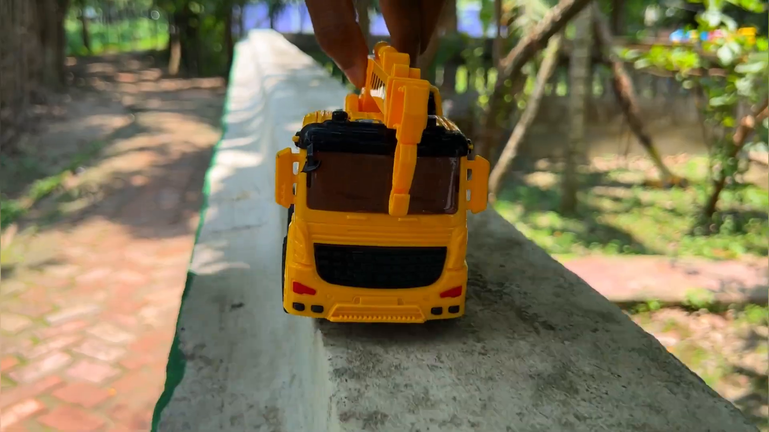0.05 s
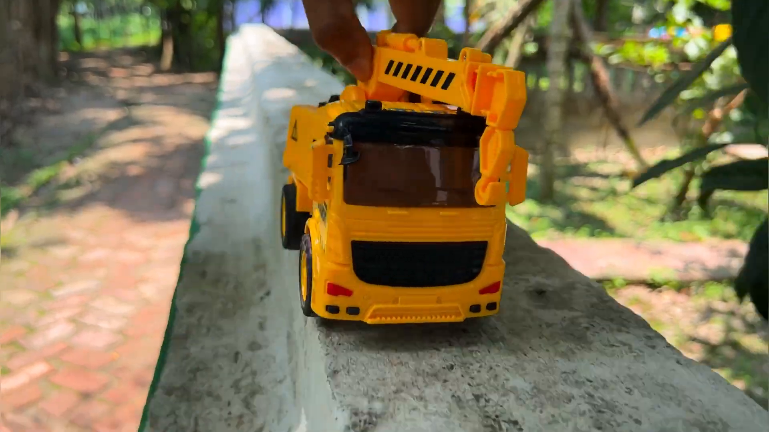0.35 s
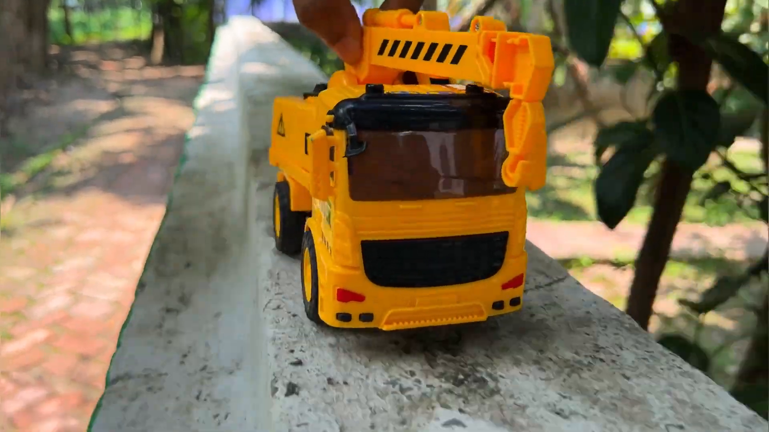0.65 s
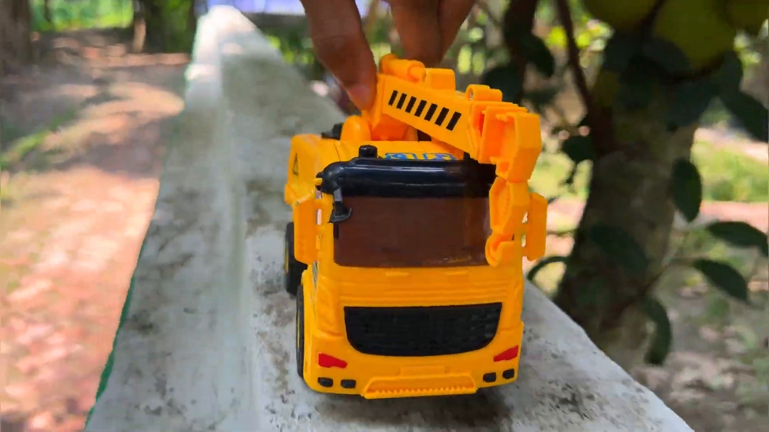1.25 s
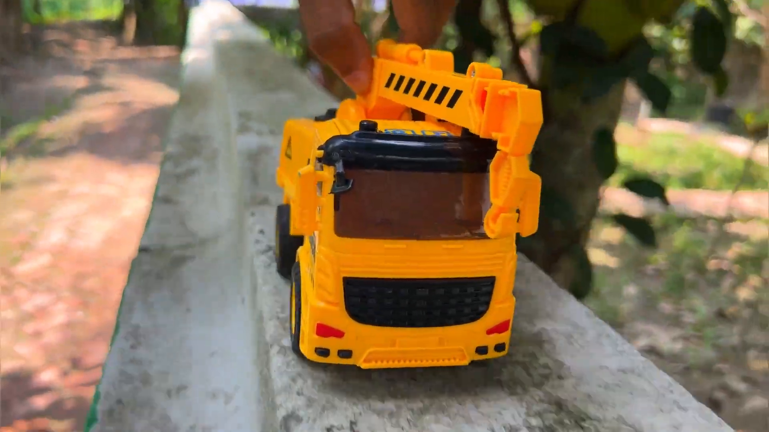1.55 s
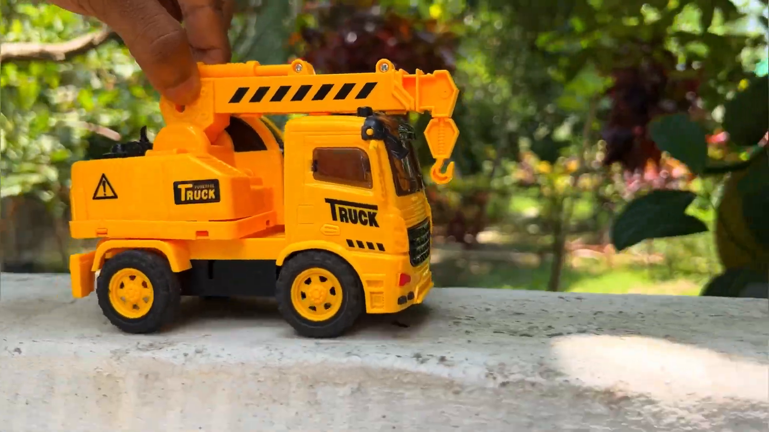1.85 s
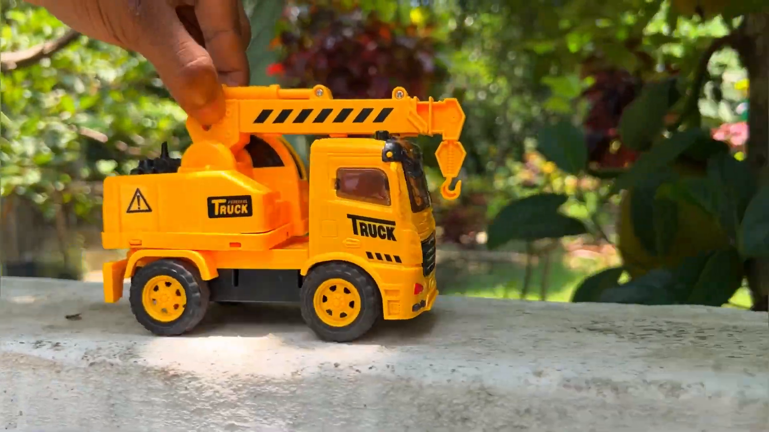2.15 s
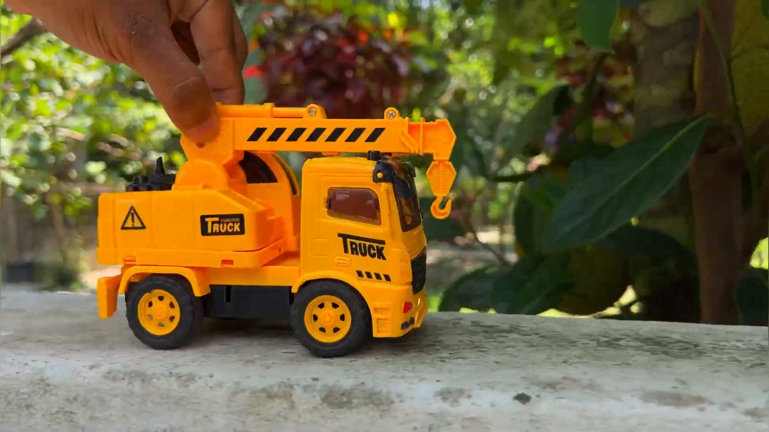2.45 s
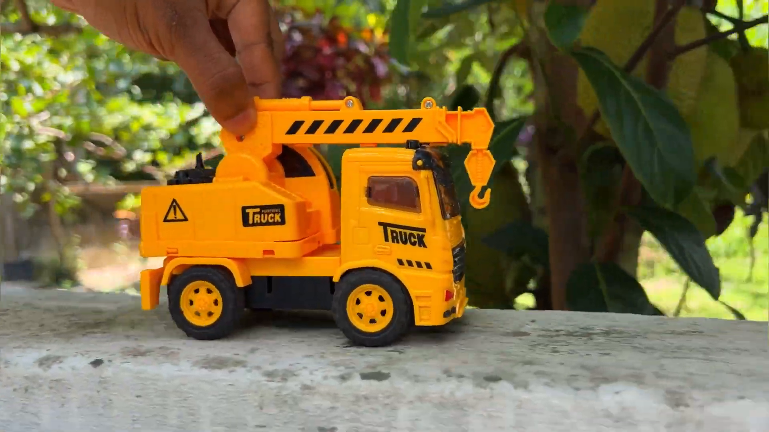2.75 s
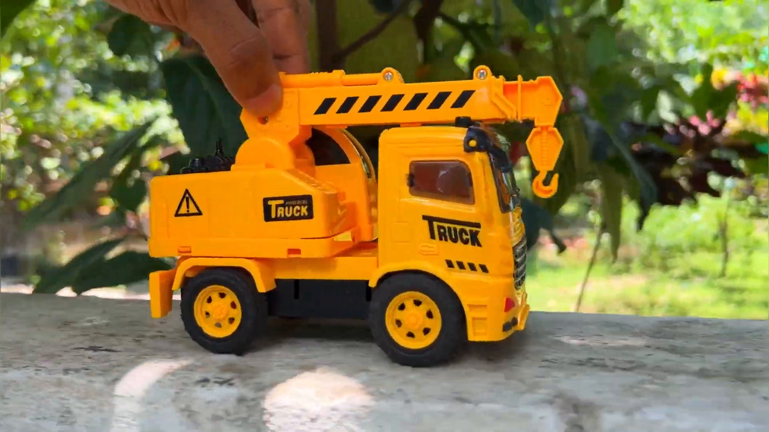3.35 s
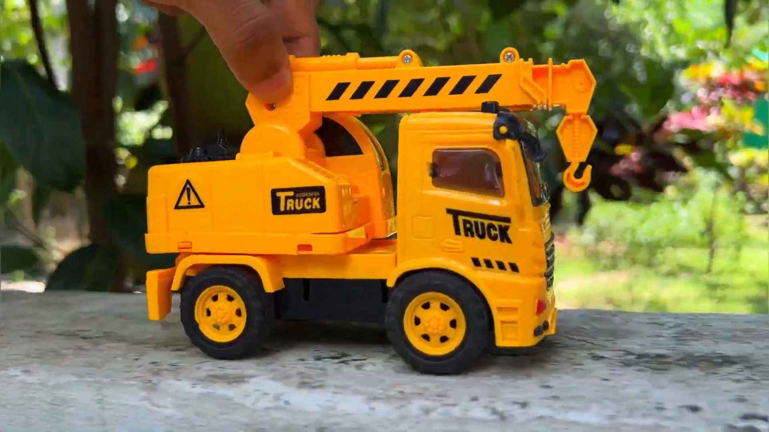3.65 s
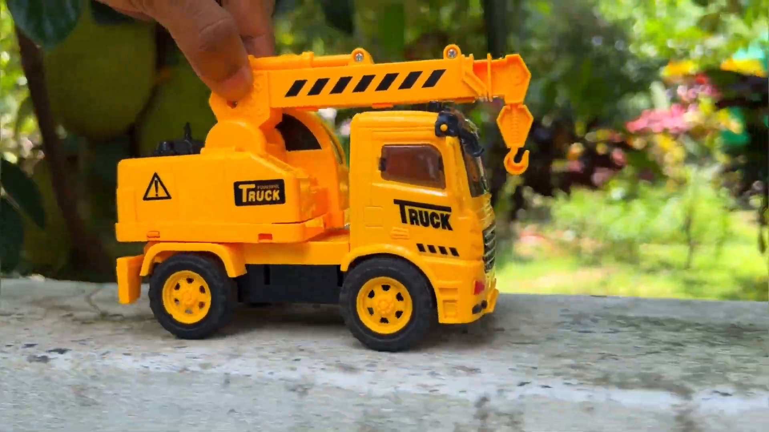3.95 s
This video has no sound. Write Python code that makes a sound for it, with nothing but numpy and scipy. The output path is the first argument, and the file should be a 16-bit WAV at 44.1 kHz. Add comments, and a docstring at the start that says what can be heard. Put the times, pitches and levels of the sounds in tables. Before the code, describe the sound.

A plastic toy truck rattles over gritty concrete close by, with fine ticks and a thin axle whirr. Small bumps click through it, the sharpest around 1.2 seconds. At about 1.7 seconds the rolling suddenly turns quieter, with brief tyre scrapes and soft thuds over a faint rumble. From 3 seconds the rattle builds again, with a stronger low thud near 3.5 seconds and more bumps until 4 seconds.

```python
"""A plastic toy crane truck rattles along, pushed by hand beside a concrete wall outdoors.
It is heard first from the front, then from the side. Grit under the hard wheels shakes the hollow
shell and ticks in the axles; larger grains give bumps. Axles whirr, sand cracks and tyres scrape.
Under it lie a dull rumble, soft thuds and a few puffs of air on two close microphone openings (ports)."""
import sys
import numpy as np
from scipy import signal
from scipy.fft import rfft, irfft
from scipy.io import wavfile
from scipy.ndimage import map_coordinates

SR = 44100
rng = np.random.default_rng(int(sys.argv[2]) if len(sys.argv) > 2 else 0)


def to_wav(s):
    """Save 16-bit WAV."""
    ch = np.atleast_2d(s).T  # columns
    pcm = np.round(np.clip(ch, -1, 1) * 32767)  # PCM
    wavfile.write(sys.argv[1], SR, pcm.astype(np.int16))


N = 176400
T, HZ = np.arange(N) / SR, np.fft.rfftfreq(2 * N, 1 / SR)

# Levels in the tables are relative: the functions add their own gains.
# How strongly the rolling wheels rattle and tick: time_s, shell_db, tick_db
FRONT_ROLLING = [(0, -28, -37.5), (.25, -29.5, -42), (.4, -27.5, -37), (.78, -28, -39), (.815, -33, -42.5),
                 (.86, -28, -38), (1.42, -27, -37), (1.65, -27, -38.5)]
SIDE_ROLLING = [(1.67, -35.5, -46), (1.9, -38.5, -51.5), (2.03, -36.5, -46), (2.2, -39, -50.5),
                (2.55, -37.5, -51), (2.61, -34, -45), (2.78, -37.5, -49.5), (2.9, -35.5, -45.5),
                (3.08, -35, -49.5), (3.19, -32.5, -41.5), (3.255, -37, -48), (3.4, -33, -45),
                (3.48, -31.5, -43), (3.64, -37, -47), (3.71, -29.5, -42.5), (3.79, -35.5, -43),
                (3.85, -29.5, -37.5), (3.94, -33, -43.5), (4, -38, -47)]
# Bumps over larger grains: start_s, level_db, tick_above_shell_db
GRAIN_BUMPS = [(.429, -26.5, 0.5), (.514, -24.5, -27), (0.6647, -22, -10), (.7786, -21, -4),
               (0.828, -27, -7), (0.8482, -19, -6.5), (.994, -21, -7), (1.1552, -18.5, -3),
               (1.167, -22, -4.5), (1.219, -22.5, -8), (1.244, -13, -10.5), (1.2665, -29, -29),
               (1.3, -27, -17), (1.483, -23.5, -5), (1.557, -20.5, -7.5), (1.569, -20.5, -9),
               (2.047, -23.5, -19), (2.2, -29, -26), (2.873, -30, -14), (2.9217, -33.5, 0.5),
               (3.158, -27, -14), (3.306, -26.5, -11), (3.3435, -29, -4), (3.384, -38, 3), (3.396, -25, -7),
               (3.409, -27.5, -8), (3.49, -32, -4), (3.753, -21.5, -7), (3.809, -22.5, -13),
               (3.935, -19.5, -9), (3.9572, -31.5, -4)]
# Tone of the hollow shell at the left port: frequency_hz, gain_db
FRONT_SHELL_TONE = [(300, -24), (520, -12.5), (740, -14), (920, -6), (1400, -1), (1580, -5.5),
                    (2350, -16.5), (2800, -15.5), (3170, -11), (3900, -12), (6200, -20), (8200, -22),
                    (15500, -36)]
SIDE_SHELL_TONE = [(100, -62), (300, -28), (520, -13.5), (660, -11), (900, 1), (1060, -4), (1300, 2),
                   (1550, -9), (2000, -11), (2600, -14), (3700, -16), (4500, -8), (6200, -18),
                   (8500, -23.5), (11000, -30), (15500, -36.5)]
# Pitches at which the thin panels ring: pitch_hz, boost_db
PANEL_PEAKS = [(935, 3.5), (1370, 1.5), (2300, 0.5), (3040, 5.5), (3600, -0.5), (4700, 1), (5350, 2.5)]
# Whirrs of the axles: start_s, length_s, level_db, pitch_hz
AXLE_WHIRRS = [(0, .8, -37, 4280), (0.862, 0.46, -36, 3230), (1.68, .33, -48, 4870),
               (2.03, 0.88, -50.5, 2280)]
# Bright scrapes of the tyres: start_s, length_s, level_db
TYRE_SCRAPES = [(2.01, 0.13, -50), (2.321, 0.033, -46.5), (2.587, 0.12, -41.5), (3.315, 0.068, -41),
                (3.818, 0.062, -38.5)]
# Soft low thuds: start_s, level_db, pitch_hz
LOW_THUDS = [(1.695, -32, 300), (1.761, -39.5, 288), (2.155, -37.5, 298), (2.274, -35.5, 248),
             (2.446, -35.5, 243), (2.599, -40, 228), (2.825, -33, 189), (3.087, -32.5, 155),
             (3.15, -28, 196), (3.386, -32.5, 200), (3.504, -29, 260), (3.534, -13, 160), (3.544, -21, 370),
             (3.571, -25, 510), (3.659, -31.5, 262), (3.76, -27, 290), (3.866, -29, 225),
             (3.909, -28.5, 216), (3.936, -24, 356)]
# Puffs of air on the microphone: centre_s, half_length_s, level_db
AIR_PUFFS = [(0.54, 0.045, -45.5), (0.752, 0.019, -33.5), (1.592, 0.022, -31.5)]
# Loudness of the rumble: time_s, level_db
RUMBLE_LEVEL = [(0, -54.5), (1.6, -51.5), (1.68, -46.5), (1.81, -73), (1.9, -48), (2.4, -50), (2.53, -67),
                (2.7, -52), (3.3, -43), (4, -42)]
# Tone of the rumble: frequency_hz, gain_db
FRONT_RUMBLE_TONE = [(20, -44), (45, -1), (110, 5), (250, -6), (500, -14), (1000, -58)]
SIDE_RUMBLE_TONE = [(20, -53), (55, -20), (110, -2), (200, -1), (350, -8), (1000, -44)]
# How much louder the left port is than the right: frequency_hz, louder_db
FRONT_LEFT_BOOST = [(700, 5), (1400, 8.5), (2400, 4.5), (3150, 3), (4300, 14), (5600, 9), (8100, 2.5),
                    (11000, -1.5), (15000, 2)]
SIDE_LEFT_BOOST = [(200, 10), (550, 3.5), (800, 12.5), (1300, 10), (2000, 4.5), (3300, 1), (4600, 11),
                   (5600, 11), (8100, 0), (15000, 1)]
# How far the right port's wave lags (the treble part adds to both views): frequency_hz, lag_radians
FRONT_LAG = [(200, -6), (2400, -5.5), (3600, -2.5), (4400, -12)]
SIDE_LAG = [(750, -6), (900, -14.5), (1300, -10.5), (1550, -1.5), (3700, 1.5), (4400, -6)]
TREBLE_LAG = [(6500, 0), (7600, 7.5), (8700, 5.5), (11600, 0.5), (13000, -9)]
# How alike the two ports sound: frequency_hz, likeness_0_to_1
PORT_LIKENESS = [(1300, 1), (2000, 0), (3150, 0.55), (4400, 0), (8300, 1), (13800, 1), (15500, 0)]

SHELL_SPREAD_DB, TICK_SPREAD_DB = 3, 4.5  # how unequal the clicks are in size
SHELL_RING_S, TICK_RING_S = 0.0036, 0.0049
SWELL_SHAPE = [0, 1, 1, 0]  # rise, hold, fade


def truck(rolling, shell_tone, split_hz=2120, shell_gain_db=2.5, tick_gain_db=5.5):
    """The main sound: knocks from the wheels rattle the hollow shell and tick in the treble."""
    times, shell_db, tick_db = np.transpose(rolling)
    shell_bumps = [(start_s, db) for start_s, db, _ in GRAIN_BUMPS]
    tick_bumps = [(start_s, db + above_db) for start_s, db, above_db in GRAIN_BUMPS]
    rattle = plastic_ring(wheel_knocks(times, shell_db, SHELL_SPREAD_DB, shell_bumps), SHELL_RING_S)
    ticks = plastic_ring(wheel_knocks(times, tick_db, TICK_SPREAD_DB, tick_bumps), TICK_RING_S)
    low_share = 1 / (1 + (HZ / split_hz) ** 8)
    tone = amp(curve(shell_tone)) * panel_gain()
    rattle = filtered(rattle, ringing_filter(unit_level(tone * np.sqrt(low_share))))
    ticks = filtered(ticks, ringing_filter(unit_level(tone * np.sqrt(1 - low_share))))
    return rattle * amp(shell_gain_db) + ticks * amp(tick_gain_db)


def wheel_knocks(times, level_db, spread_db, bumps, crunch_s=0.002, bounce_s=0.004):
    """Hard wheels roll over grit; each larger grain adds a click, a crunch and a small bounce."""
    force = grit(spread_db) * amp(np.interp(T, times, level_db))
    crunch_fade = np.exp(-T[:SR // 200] / crunch_s)
    click = unit_level(signal.unit_impulse(len(crunch_fade)))
    for (start_s, db), chance in zip(bumps, rng.random(len(bumps))):
        crunch = unit_level(crunch_fade * rng.choice([-1, 1], len(crunch_fade)))
        knock = amp(db - 3) * unit_level(click + crunch)
        add(force, start_s, knock)
        add(force, start_s + bounce_s * (.5 + chance), knock * amp(-8))
    return force


def grit(spread_db, grains_per_s=2200, clump_db=1.5, clump_hz=71):
    """Grains give many tiny clicks, big and small; uneven pressure makes them louder in clumps."""
    size = amp(spread_db * np.minimum(rng.exponential(1, N), 4)) * rng.choice([-1, 1], N)
    hits = rng.random(N) < grains_per_s / SR
    slow_band = HZ / (HZ + 10) / (1 + (HZ / clump_hz) ** 2)
    pressure = unit_level(filtered(rng.standard_normal(N), slow_band))
    return unit_level(size * hits * amp(clump_db * pressure))


def plastic_ring(force, ring_s, spots=16, ring_share=0.66, tail_s=0.02, tail_db=-11):
    """Each click hits one of several spots with its own short ring. Gives two unrelated signals."""
    t = np.arange(4096) / SR
    spot_hit = rng.integers(0, spots, N)
    sound = np.zeros((2, N))
    for spot in range(spots):
        ring_noise, tail_noise = rng.standard_normal((2, 2, len(t)))
        ring = unit_level(ring_noise * np.exp(-t / ring_s))
        tail = unit_level(tail_noise * np.exp(-t / tail_s))
        response = (ring + amp(tail_db) * tail) / np.sqrt(len(t))
        response[0] *= np.sqrt(ring_share)
        response[0, 0] += np.sqrt(1 - ring_share)  # the first signal keeps some bare click
        sound += signal.oaconvolve((force * (spot_hit == spot))[None], response, axes=1)[:, :N]
    return sound


def panel_gain(sharpness=16):
    """Thin plastic panels boost the few pitches at which they ring."""
    return amp(sum(db / (1 + (2 * sharpness * (HZ / hz - 1)) ** 2) for hz, db in PANEL_PEAKS))


def axle_whirr(start_s, length_s, level_db, pitch_hz, width_hz=470, pitch_drop=0.06):
    """The axles chatter around one ringing pitch, which sinks a little as it dies away."""
    band = 1 / (1 + (2 * (HZ - pitch_hz) / width_hz) ** 2)
    chatter = filtered(plastic_ring(grit(SHELL_SPREAD_DB), TICK_RING_S), ringing_filter(band))
    progress = np.clip((T - start_s) / length_s, 0, 1)
    position = np.cumsum(1 - pitch_drop * progress)  # reading more slowly lowers the pitch
    sinking = np.array([map_coordinates(row, [position]) for row in chatter])
    return unit_level(sinking) * amp(level_db) * np.interp(progress, [0, 0.0094, .5, 1], SWELL_SHAPE)


def sand_cracks(rolling, cracks_per_s=65, gain_db=-10.5):
    """Now and then a grain of sand cracks under a wheel with a thin, sharp tick."""
    times, _, tick_db = np.transpose(rolling)
    clicks = unit_level(rng.uniform(0, 1, N) * (rng.random(N) < cracks_per_s / SR))
    force = clicks * amp(np.interp(T, times, tick_db) + gain_db)
    band = unit_level(pitch_band(HZ, pitch_hz=10900, octaves=0.88))
    return filtered(plastic_ring(force, ring_s=0.0016), ringing_filter(band))


def tyre_scrapes():
    """A tyre skids on fine grit and sets the panels ringing; it starts quickly and trails off."""
    loudness = sum(amp(db) * np.interp((T - start_s) / length_s, [0, 0.066, .5, 1], SWELL_SHAPE)
                   for start_s, length_s, db in TYRE_SCRAPES)
    tone = pitch_band(HZ, pitch_hz=8100, octaves=1.1) * panel_gain()
    hiss = filtered(plastic_ring(grit(TICK_SPREAD_DB), TICK_RING_S), ringing_filter(tone))
    return unit_level(hiss) * loudness


def thuds(rise_s=0.007, gain_db=-2.5, low_cut_hz=97, stereo_width=0.23):
    """Soft thuds swell and die within a few swings, slightly different at each port."""
    middle, sides = np.zeros((2, N))
    age = T[:SR // 10] / rise_s
    swell = age * np.exp(1 - age)
    for start_s, db, pitch_hz in LOW_THUDS:
        for part in middle, sides:
            add(part, start_s, amp(db + gain_db) * burst(swell, pitch_hz, octaves=0.54))
    return filtered(stereo(middle, stereo_width * sides), 1 - 1 / (1 + (HZ / low_cut_hz) ** 4))


def air_puffs():
    """Air brushes the microphone in short, deep swells."""
    return sum(amp(db) * burst(np.exp(-.5 * ((T - centre_s) / half_s) ** 2), pitch_hz=68.6, octaves=0.37)
               for centre_s, half_s, db in AIR_PUFFS)


def rumble(tone, stereo_width=0.46):
    """A dull rumble lies under the rolling, nearly alike at both ports."""
    middle, sides = filtered(rng.standard_normal((2, N)), amp(curve(tone)))
    loudness = amp(np.interp(T, *np.transpose(RUMBLE_LEVEL)))
    return unit_level(stereo(middle, stereo_width * sides)) * loudness


def microphone_ports(pair, left_boost, lag):
    """Two close ports: the right one hears a shifted, partly different sound."""
    left, unrelated = pair
    alike = curve(PORT_LIKENESS)
    shift = amp(-curve(left_boost)) * np.exp(-1j * (curve(lag) + curve(TREBLE_LAG)))
    right = filtered(left, shift * alike) + filtered(unrelated, shift * np.sqrt(1 - alike ** 2))
    return np.array([left, right])


def burst(swell, pitch_hz, octaves):
    """A few uneven swings around one pitch, growing and fading with the swell."""
    band = pitch_band(np.fft.rfftfreq(len(swell), 1 / SR), pitch_hz, octaves)
    swings = irfft(band * np.exp(2j * np.pi * rng.random(len(band))), len(swell))
    return unit_level(swings * swell) * np.sqrt(np.mean(swell ** 2))


def pitch_band(frequencies, pitch_hz, octaves):
    """A bell-shaped gain around one pitch."""
    return np.exp(-.5 * (np.log2((frequencies + 1) / pitch_hz) / octaves) ** 2)


def ringing_filter(gain):
    """A filter with this gain that rings only after a click, never before it."""
    cepstrum = irfft(np.log(np.maximum(gain, 1e-5)))
    cepstrum[1:N] *= 2
    cepstrum[N + 1:] = 0  # this half stands for the time before the click
    return np.exp(rfft(cepstrum))


def filtered(sound, response):
    """Turns each frequency up or down and shifts it in time, as the response says."""
    return irfft(rfft(sound, 2 * N) * response)[..., :N]


def curve(table):
    """Joins a table's points into a value for every frequency."""
    hz, value = np.transpose(table)
    return np.interp(np.log(HZ + 1), np.log(hz), value)


def stereo(middle, sides):
    """Makes left and right from a shared part and an opposite part."""
    return np.array([middle + sides, middle - sides])


def add(mix, start_s, sound):
    """Mixes a sound in at a given time."""
    part = mix[max(round(start_s * SR), 0):][:len(sound)]
    part += sound[:len(part)]


def unit_level(sound):
    """Scales to an average (rms) level of 1."""
    return sound / np.sqrt(np.mean(sound ** 2) + 1e-20)


def amp(db):
    """Turns decibels into a gain."""
    return 10 ** (np.asarray(db) / 20)


def scene(switch_s=1.66, fade_s=0.018, return_s=0.017):
    """The truck from the front, then from the side; the level dips briefly in between."""
    axles = sum(axle_whirr(*row) for row in AXLE_WHIRRS)
    front = truck(FRONT_ROLLING, FRONT_SHELL_TONE) + sand_cracks(FRONT_ROLLING) + axles
    front = microphone_ports(front, FRONT_LEFT_BOOST, FRONT_LAG)
    side = truck(SIDE_ROLLING, SIDE_SHELL_TONE) + sand_cracks(SIDE_ROLLING) + axles + tyre_scrapes()
    side = microphone_ports(side, SIDE_LEFT_BOOST, SIDE_LAG)
    front += rumble(FRONT_RUMBLE_TONE) + air_puffs()
    side += rumble(SIDE_RUMBLE_TONE) + thuds()
    fade_out = np.clip((switch_s - T) / fade_s, 0, 1)
    fade_in = np.clip((T - switch_s + fade_s) / (return_s + fade_s), 0, 1) ** 2
    return front * fade_out + side * fade_in


def record(dry):
    """Removes the highest treble, above 15900 Hz."""
    low_pass = signal.firwin(511, 15900, window=("kaiser", 9), fs=SR)
    return signal.oaconvolve(dry, low_pass[None], "same")


dry = scene()
out = record(dry)
to_wav(out)
```